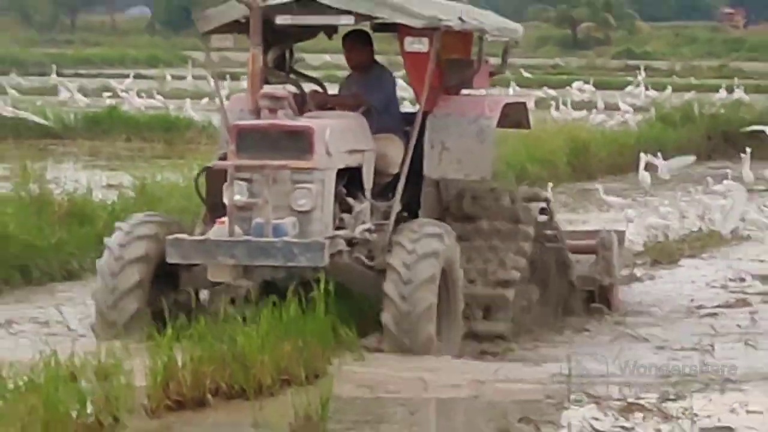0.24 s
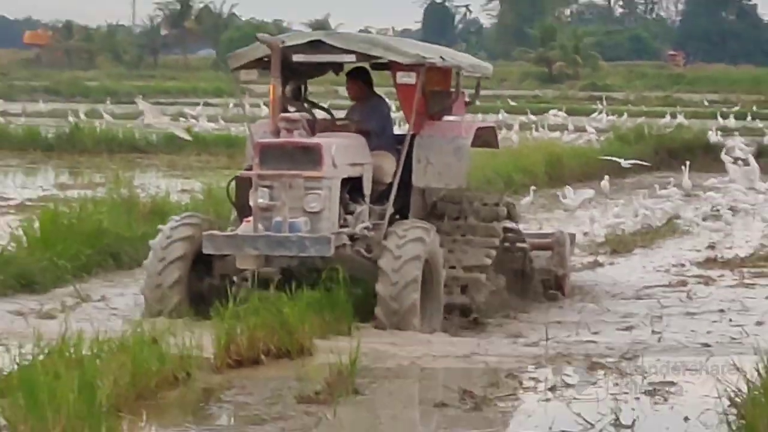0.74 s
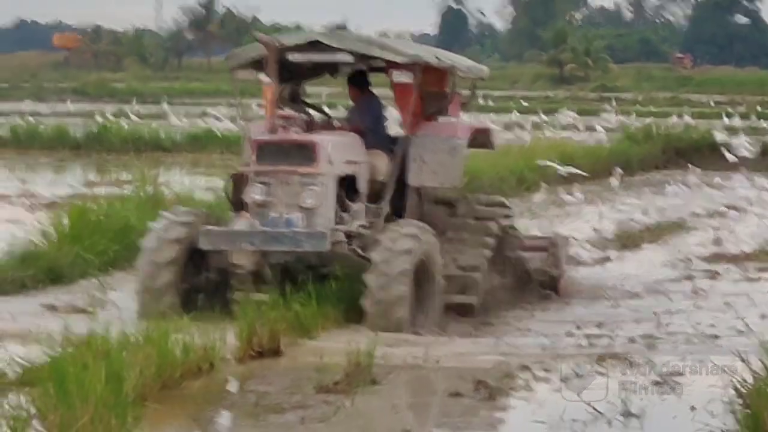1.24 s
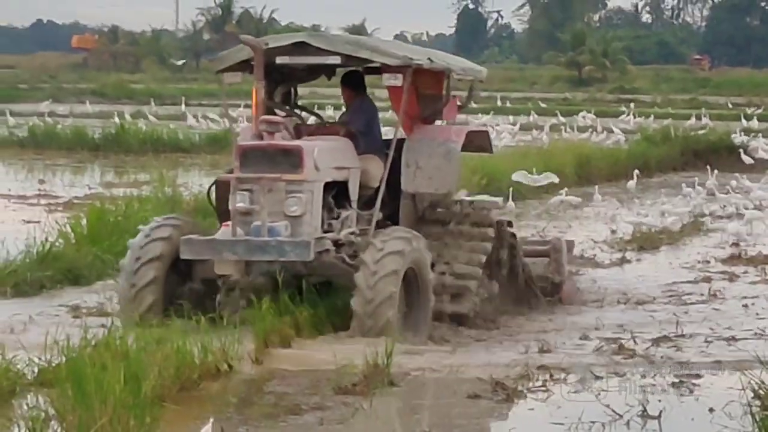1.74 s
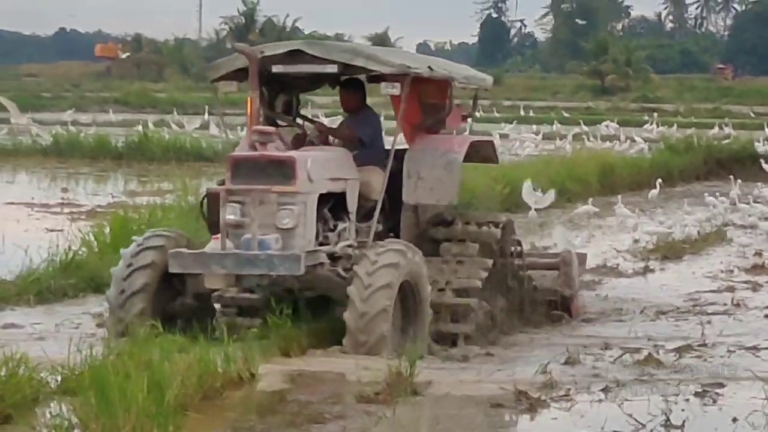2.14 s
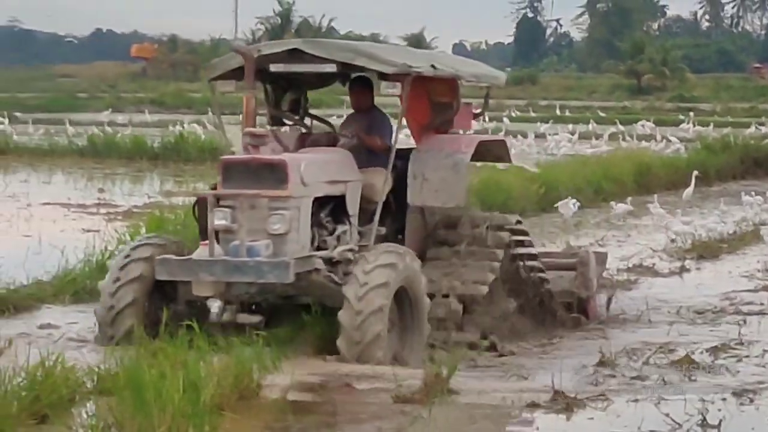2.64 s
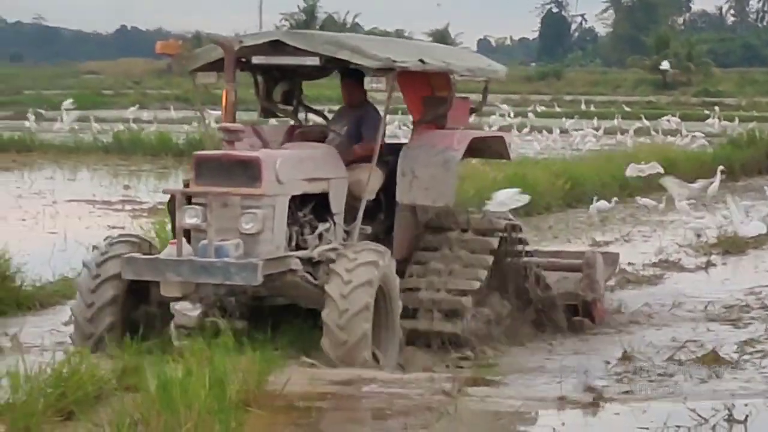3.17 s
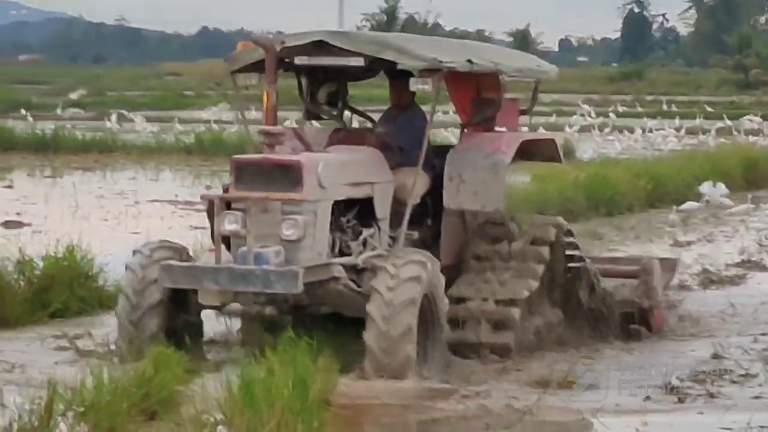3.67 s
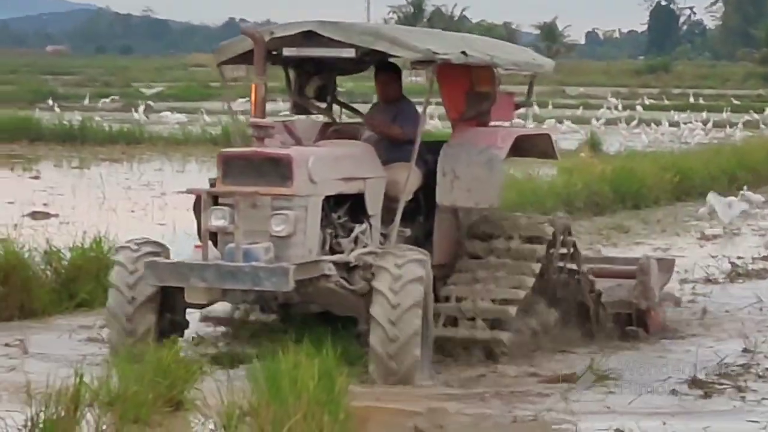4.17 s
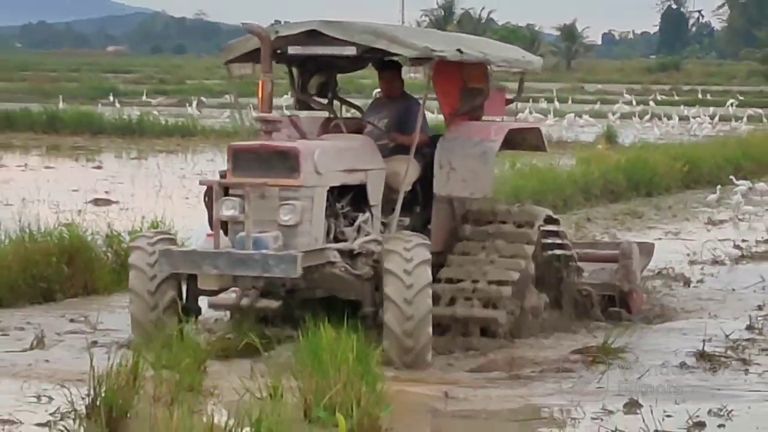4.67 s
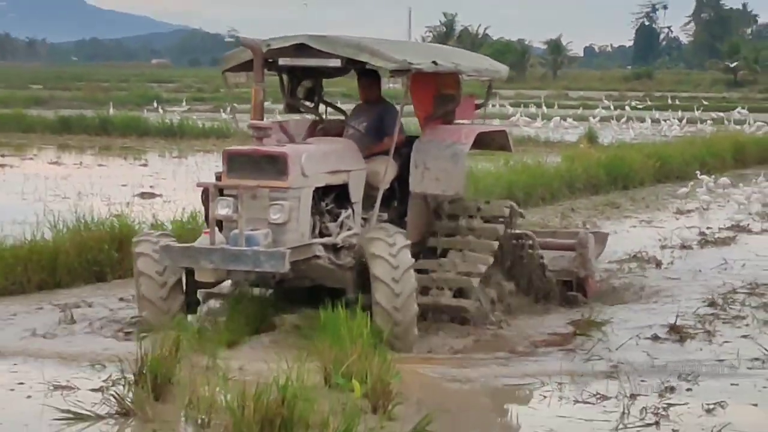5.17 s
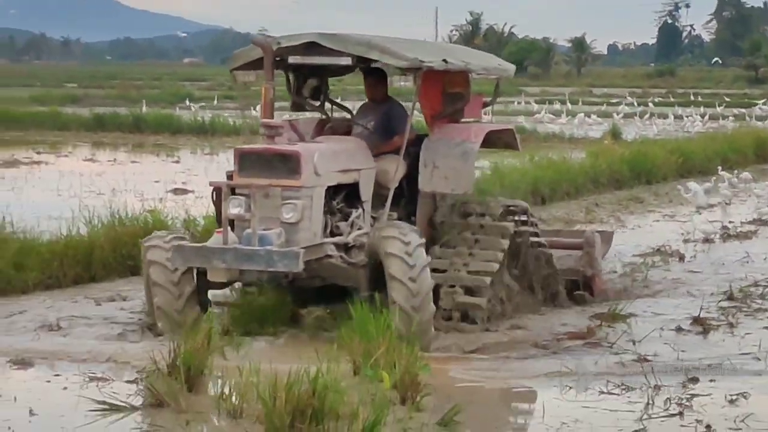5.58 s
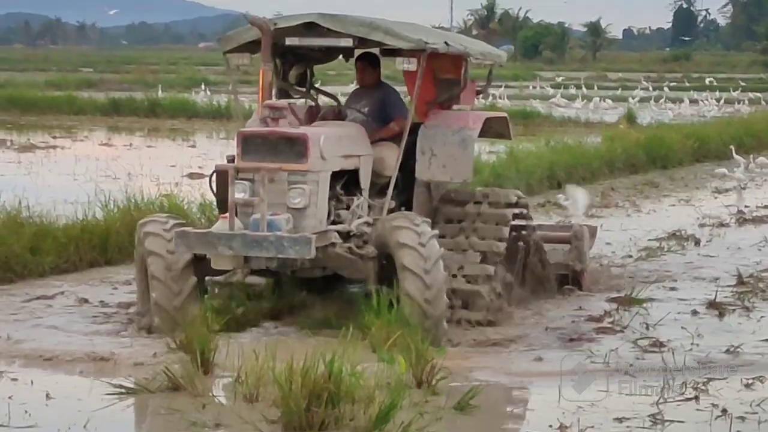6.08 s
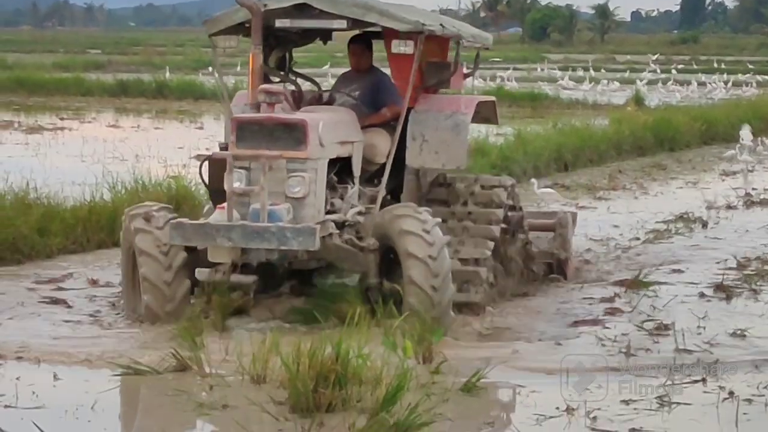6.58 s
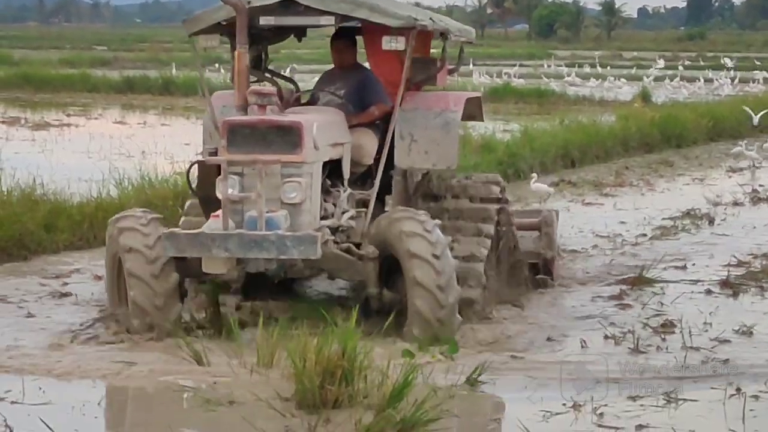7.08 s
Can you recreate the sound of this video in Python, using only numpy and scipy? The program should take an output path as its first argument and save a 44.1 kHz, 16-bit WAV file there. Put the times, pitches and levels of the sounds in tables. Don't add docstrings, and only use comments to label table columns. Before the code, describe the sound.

Steady loaded diesel engine from start to end, heard outdoors from the bank of a wet field. Fast uneven firing knocks ring in the metal block over a droning exhaust and a dull rumble of churning mud. The speed wanders only slightly, easing up twice and sagging after each. A faint airy hiss leans left and shifts; the phone's treble is dull and mottled, while the low end stays nearly centred.

```python
import sys
import numpy as np
from scipy import signal
from scipy.io import wavfile
from scipy.ndimage import uniform_filter1d

SR = 44100
rng = np.random.default_rng(int(sys.argv[2]) if len(sys.argv) > 2 else 0)


def boost(x):
    u = np.asarray(x, float) / 20
    return 10 ** u


def generate_wav(sig):
    pcm = np.round(np.clip(np.atleast_2d(sig).T, -1, 1) * 32767).astype(np.int16)
    wavfile.write(sys.argv[1], SR, pcm)


N = 322812


def rms_one(x):
    return x / np.sqrt(np.mean(x ** 2) + 1e-20)


def in_time(rows):
    s, *columns = np.transpose(rows)
    return [np.interp(np.arange(N) / SR, s, c) for c in columns]


def at_hz(points, hz):
    table_hz, db = np.transpose(points)
    return np.interp(np.log(hz), np.log(table_hz + 1), db)


def drift(rate):
    r = np.exp(-80 * np.pi * rate / SR)
    slow = signal.lfilter([1], [1, -2 * r, r * r], rng.standard_normal(N // 40 + 2002))[2000:]
    return np.interp(np.arange(N) / 40, np.arange(len(slow)), rms_one(slow))


def ring(clicks, hz, t60):
    r = np.exp(-np.log(1000) / (t60 * SR))
    w = 2 * np.pi * hz / SR
    return signal.lfilter([0, np.sin(w)], [1, -2 * r * np.cos(w), r * r], clicks + 1e-18)


# pitch in Hz, side level minus middle level in dB.
STEREO_WIDTH = [(60, -34), (110, -21), (200, -30.5), (380, -15), (700, -34.5), (1290, -14), (2380, -10),
                (4400, -6), (8120, -7.5), (15000, 26.5)]


def wide(mid, side, hz):
    return mid + boost(at_hz(STEREO_WIDTH, hz)) * side * np.array([[1], [-1]])


def bank(spectrum, edges, shape):
    out, white = 0, rng.standard_normal((2, 2, N))
    for k, (low, high) in enumerate(zip(edges, edges[1:])):
        hz = np.sqrt(low * high)
        gate, gain = shape(hz)
        band = signal.butter(2, [low, high], "band", fs=SR, output="sos")
        mid, side = signal.sosfilt(band, white[k % 2] * gate)
        out = out + boost(at_hz(spectrum, hz)) * gain * wide(mid, side, hz)
    return rms_one(out)


# pitch in Hz, level in dB per Hz.
RUMBLE_SPECTRUM = [(12, -47), (20, -12), (54, 1), (103, 1), (183, 8.5), (229, 14.5), (312, -1.5),
                   (361, -35), (450, -52), (580, -54), (990, -120)]


def rumble():
    low = bank(RUMBLE_SPECTRUM, 20 * 2 ** np.arange(0, 4.6, .5), lambda hz: (1, boost(drift(6.1))))
    drone = rms_one(ring(rng.standard_normal(N), 261.0, 0.16))
    return boost(-26.5) * low + boost(-31) * drone


REGRIP_S = 0.15

# start in seconds, cavity pitch in Hz, its level in dB,
# second resonance level in dB, third resonance level in dB.
HAND_GRIPS = [
    (0, 6340, -53, -58, -52.5),
    (1.08, 6000, -47.5, -62, -52),
    (1.65, 6760, -45.5, -54, -53.5),
    (2.7, 7060, -45, -54.5, -51.5),
    (3.6, 6880, -55.5, -52.5, -57),
    (5.38, 6510, -45.5, -60, -53),
    (6.12, 6740, -43.5, -58, -56),
    (6.45, 5900, -44, -57, -58),
]


def grip():
    s, *columns = np.transpose(HAND_GRIPS)
    held = np.searchsorted(s[1:], np.arange(N) / SR)
    return [uniform_filter1d(c[held], int(REGRIP_S * SR)) for c in columns]


def hand_hiss():
    wander_hz, fidget_db = 250, 2
    first_hz, first_db, second_db, third_db = grip()
    first_hz = first_hz + wander_hz / 2 * drift(1.5)
    second_hz = 10370 + wander_hz * drift(1.5)
    third_hz = np.full(N, 14000.0)
    resonances = ((first_hz, first_db - 4.0, 650),  # pitch, level, width in Hz
                  (second_hz, second_db - 0.5, 1400),
                  (third_hz, third_db - 3.0, 1500))
    out, slosh = np.zeros(N), drift(16.0)
    for hz, db, width_hz in resonances:
        lowpass = signal.butter(3, width_hz, fs=SR, output="sos")
        slow = signal.sosfilt(lowpass, rng.standard_normal((2, N)))
        turn = 2 * np.pi * np.cumsum(hz) / SR
        hiss = rms_one(slow[0] * np.cos(turn) + slow[1] * np.sin(turn))
        out += boost(db + fidget_db * drift(2.5) + slosh + drift(29.0)) * hiss
    return out * boost([[3.0], [-14.0]])


# start
# in seconds, end in seconds, centre in Hz, depth in dB.
SHADOW_VALLEYS = [(1, 6.4, 450, 4), (3, 5.2, 1230, 5), (2.3, 3.4, 15400, 8), (0, 1, 8400, 9),
                  (-0.5, 1.3, 10000, 5), (5.5, 8.4, 2750, 3), (6.3, 8.2, 2100, 3), (2.2, 3.5, 8700, 4),
                  (1, 3, 11800, 1), (3.5, 5.402, 5650, 7), (5.5, 5.8, 10500, 6.5), (6.5, 6.4, 7400, -5),
                  (6.5, 7.25, 11150, 14)]


def valley_shadow(x):
    hz, s, z = signal.stft(x, SR, nperseg=1024)
    hz = hz[:, None]
    loss_db = 0
    for start, end, centre_hz, depth_db in SHADOW_VALLEYS:
        width_hz = 70 + .033 * centre_hz
        valley = np.exp(-((hz - centre_hz) / width_hz) ** 2)
        present = np.interp(s, [start - REGRIP_S, start, end, end + REGRIP_S], [0, 1, 1, 0])
        loss_db = loss_db + depth_db * valley * present
    patches = rng.standard_normal(z.shape[1:])
    for axis, size in ((0, 2), (0, 2), (1, 3), (1, 2)):
        patches = uniform_filter1d(patches, size, axis=axis)
    reach = np.clip(np.log2((hz + 1) / 1500), 0, 1)
    mottle_db = 2.4 * reach * rms_one(patches)
    return signal.istft(z * boost(mottle_db - loss_db), SR, nperseg=1024)[1][:, :N]


# time in seconds, delay in milliseconds.
WATER_MIRROR = [(0, 1.215), (1, 1.157), (2, 1.17), (3, 1.224), (4, 1.32), (5, 1.325), (6, 1.357),
                (6.5, 1.17), (7.32, 1.135)]


def water_echo(x, share, dull_hz):
    at = np.arange(N) - in_time(WATER_MIRROR)[0] * SR / 1000
    late = np.array([np.interp(at, np.arange(N), side) for side in x])
    dull = signal.butter(2, dull_hz, fs=SR, output="sos")
    return x + share * signal.sosfiltfilt(dull, late)


# time in seconds, speed in rpm.
CRANK_SPEED = [(0.0, 1892.5), (1.29, 1877.6), (1.46, 1872.7), (1.7, 1855.3), (2.51, 1862.8), (3.17, 1875.6),
               (3.66, 1922.2), (4.1, 1911.2), (4.68, 1863.5), (5.1, 1865.0), (5.82, 1910.1), (6.09, 1892.4),
               (6.36, 1859.7), (6.71, 1850.7), (7.32, 1867.7)]


def engine_cycle():
    return -.092 + np.cumsum(in_time(CRANK_SPEED)[0] / 120) / SR


def unloading():
    return (in_time(CRANK_SPEED)[0] - 1868) / 100


# time in seconds, swing from 0 to 1.
BONNET_TURN = [(0, 0.2), (1.5, 0.34), (2.2, 0.16), (2.85, 0.57), (3.4, 0.65), (4.65, 0.73), (5.2, 0.32),
               (6.0, 0.7), (6.6, -.1), (7.32, 0.44)]
# pitch in Hz, change in dB for a full swing, change in dB per 100 rpm.
ENGINE_PARTS = [(700, -2.2, 2), (1080, 1, 2.2), (1570, 5.5, -1.2), (3000, -0.5, 1), (6000, -3, 6)]


def facing_db(hz):
    part_hz, swing_db, speed_db = np.transpose(ENGINE_PARTS)
    swing = np.interp(np.log(hz), np.log(part_hz), swing_db)
    speed = np.interp(np.log(hz), np.log(part_hz), speed_db)
    return swing * (in_time(BONNET_TURN)[0] - .5) + speed * unloading()


# knock level in dB, tick level in dB, stack puff level in dB.
CYLINDER_LEVELS = [
    (-1.5, -3, -1),
    (0, -3, -1),
    (-3, 0, -7),
    (-3.5, -.5, 0),
]


def firings(cycle, lead):
    count = np.floor(4 * (cycle + lead)).astype(int)
    at = np.flatnonzero(np.diff(count)) + 1
    return at, np.array(CYLINDER_LEVELS)[count[at] % 4]


# pitch in Hz, level in dB per Hz.
CLATTER_SPECTRUM = [(190, -30), (330, 0), (346, -4.5), (455, -4.5), (738, -9.5), (955, -8.5), (1220, -7.5),
                    (1570, -10), (1970, -14), (2210, -16.5), (2950, -20), (5180, -37.5), (6820, -45),
                    (8270, -40), (15500, -78.5)]


def clatter(cycle):
    at, level_db = firings(cycle, lead=0.044)
    chance = rng.standard_normal((len(at), 3))
    puffs = np.zeros((3, N))
    puffs[:, at] = boost(level_db + 2.0 * chance).T
    for seconds in (.0019, .0027):
        r = np.exp(-1 / (seconds * SR))
        puffs = signal.lfilter([1 - r], [1, -r], puffs)
    puffs = puffs / puffs.mean(axis=1, keepdims=True)
    knocks = puffs[0]
    ticks = np.roll(puffs[1], -int(.001 * SR))
    breaths = np.roll(puffs[2], -int(.004 * SR))
    slosh = drift(16.0)

    def shape(hz):
        depth = np.interp(np.log(hz), np.log([400, 1500, 4000, 8000]), [0.26, 0.23, 0.18, 0.082])
        pulses = breaths if hz < 620 else ticks if hz > 3300 else knocks
        gate = rms_one(1 - depth + depth * pulses)
        return gate, boost(facing_db(hz) + .6 * slosh + 1.1 * drift(9.0))

    return bank(CLATTER_SPECTRUM, 330 * 2 ** np.arange(0, 5.7, 1 / 3), shape)


# time in seconds, force level in dB
# (10 dB is added).
HARD_KNOCKS = [(0.187, -4), (0.511, -11), (0.701, -6.5), (1.468, -6.5), (1.548, -1.5), (1.742, -11),
               (2.176, -9.5), (2.258, -4), (2.324, -6.5), (2.518, -0.5), (2.887, -8), (3.03, -6),
               (3.287, -5.5), (3.35, -10), (3.743, -15), (3.977, -10.5), (4.166, -2), (4.483, -7.5),
               (4.917, -6.5), (5.046, -5.5), (5.287, -12), (5.889, -9), (6.318, -10), (6.528, -3.5),
               (6.72, -5), (6.851, -6), (6.981, -6), (7.174, -12)]
# pitch in Hz, level in dB, time to fall 60 dB in seconds.
BLOCK_MODES = [(694, -4, 0.042), (748.6, 1.5, 0.037), (937, 7.5, 0.012), (1114, 8, 0.017),
               (1490, 3.5, 0.013), (1581.5, 0, 0.031), (1730, -1.5, 0.021), (2238, -3.5, 0.019),
               (2873, -6.5, 0.025)]


def knock(cycle):
    at, level_db = firings(cycle, lead=.065)
    force_db = level_db[:, 0] + 1.5 * rng.standard_normal(len(at))
    for s, db in HARD_KNOCKS:
        force_db[np.argmin(abs(at - s * SR))] = db + 10.0
    out = 0
    for hz, db, t60 in BLOCK_MODES:
        chance, clicks = rng.standard_normal((len(at), 3)), np.zeros((2, N))
        late = np.clip(at + (0.00022 * SR * chance[:, 0]).astype(int), 0, N - 1)
        clicks[0, late] = boost(force_db + db + 3.35 * chance[:, 1])
        clicks[1, late] = clicks[0, late] * chance[:, 2]
        swelling = ring(clicks, hz, t60) - ring(clicks, hz, t60 / 5)
        out = out + boost(facing_db(hz)) * wide(*swelling, hz)
    return rms_one(out)


def fan(cycle, turn):
    cancels_s = 4.02
    slip = (cycle - cycle[int(cancels_s * SR)]) / 9.04
    return -boost(-30.5) * np.cos(turn + 2 * np.pi * slip)


# order (waves per engine cycle), rms level in dB.
EXHAUST_ORDERS = [(1, -70), (2, -71), (3, -73), (4, -30), (5, -93), (6, -77), (7, -95), (8, -31.5),
                  (9, -41), (10, -39), (11, -28), (12, -21), (13, -49.5), (14, -61), (15, -51.5), (16, -29),
                  (17, -51), (18, -43), (19, -33), (20, -28.5), (21, -78), (22, -42.5), (23, -47),
                  (24, -66)]


def exhaust(cycle, third_db, fourth_db, beat_db):
    steered = {12: third_db, 16: fourth_db, 11: beat_db}
    hum = np.zeros(N)
    for order, db in EXHAUST_ORDERS:
        sway = .07 * np.sqrt(order / 12) * drift(5.0)
        off = order - 4 * round(order / 4)
        uneven = off * .11 * abs(off)
        spread = .025 * (order - 10) ** 2 - 1.1
        turn = 2 * np.pi * (order * cycle - uneven) + spread
        hum += boost(steered.get(order, db) + .8 * drift(6.0)) * np.cos(turn + sway)
        if order == 16:
            hum += fan(cycle, turn + sway)
    return wide(np.sqrt(2) * hum, hum * drift(3.1), 200) * boost([[-.15], [.15]])


def scene():
    cycle = engine_cycle()
    away_db = -0.32 * np.arange(N) / SR
    light = np.maximum(unloading(), 0)
    hum = exhaust(cycle, third_db=-19 + away_db - 11 * light, fourth_db=-25.5 + 2 * away_db,
                  beat_db=-28 + away_db + 1.5 * light)
    parts = boost(-24.8) * knock(cycle) + boost(-23.1) * clatter(cycle)
    block = water_echo(parts, share=.5, dull_hz=2300)
    return hum + rumble() + valley_shadow(block + hand_hiss())


def patch_gate(x, from_hz, under_db):
    hz, _, z = signal.stft(x, SR, nperseg=2048, noverlap=1024)
    power = uniform_filter1d(np.sum(abs(z) ** 2, axis=0), size=6, axis=0)
    steady = uniform_filter1d(power, size=3, axis=1)
    around = np.exp(uniform_filter1d(np.log(steady + 1e-20), size=61, axis=0))
    reach = np.clip(np.log2((hz[:, None] + 1) / from_hz), 0, 1)
    threshold = around * boost(2 * under_db) * reach
    keep = np.clip(power / (threshold + 1e-20), 0, 1) ** 10
    return signal.istft(z * keep, SR, nperseg=2048, noverlap=1024)[1][:, :N]


def low_pass(x):
    return signal.sosfilt(signal.butter(12, 15760, fs=SR, output="sos"), x)


def record(dry):
    soft = 0.88 * np.tanh(dry / 0.77)
    soft = signal.sosfilt(signal.butter(1, 12, "high", fs=SR, output="sos"), soft)
    gated = patch_gate(soft, from_hz=2000, under_db=-1.7)
    return low_pass(gated)


dry = scene()
out = record(dry)
generate_wav(out)
```